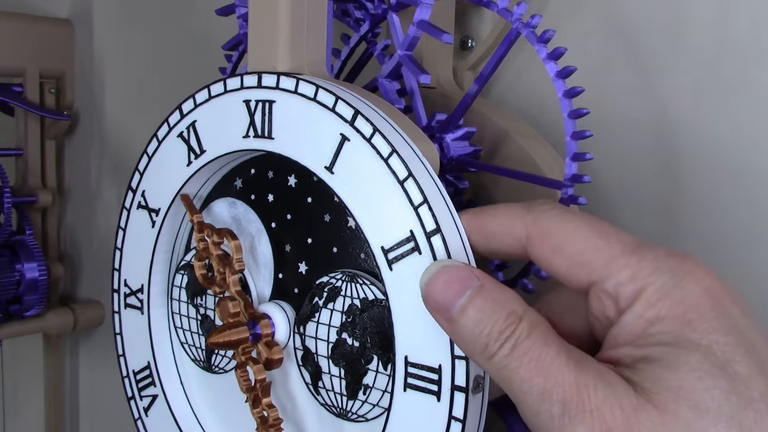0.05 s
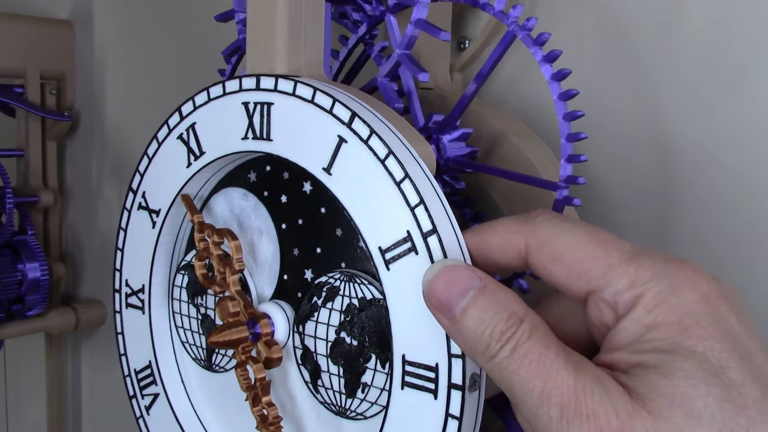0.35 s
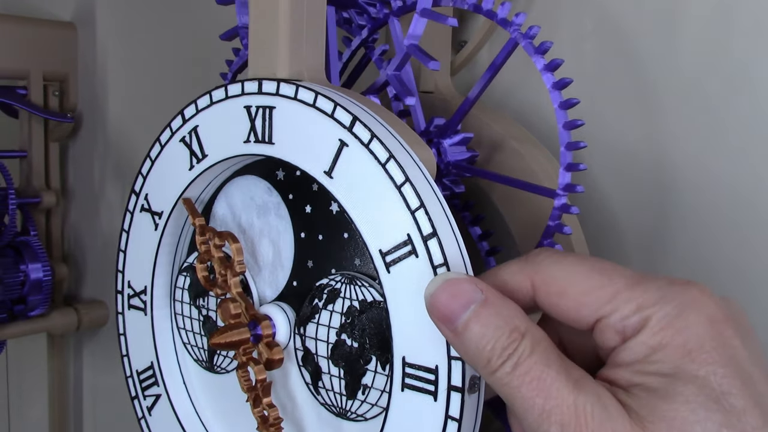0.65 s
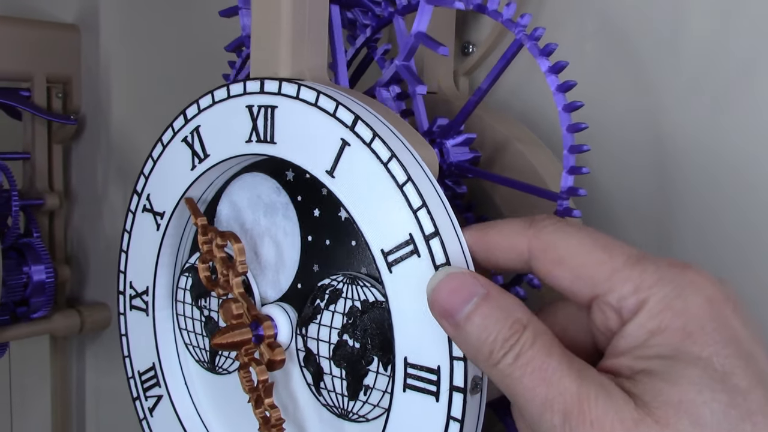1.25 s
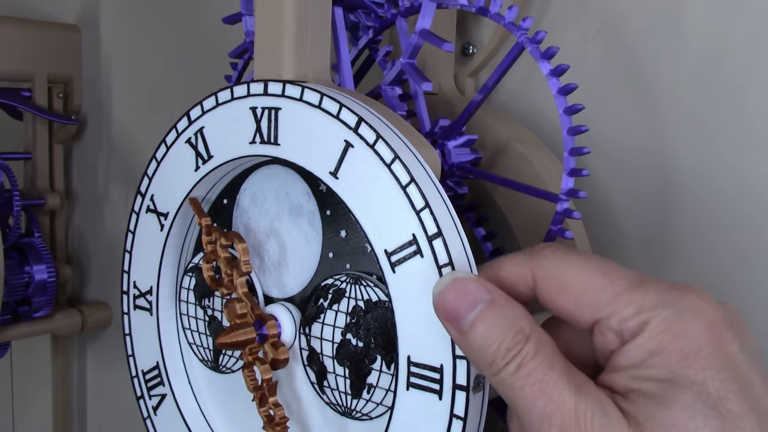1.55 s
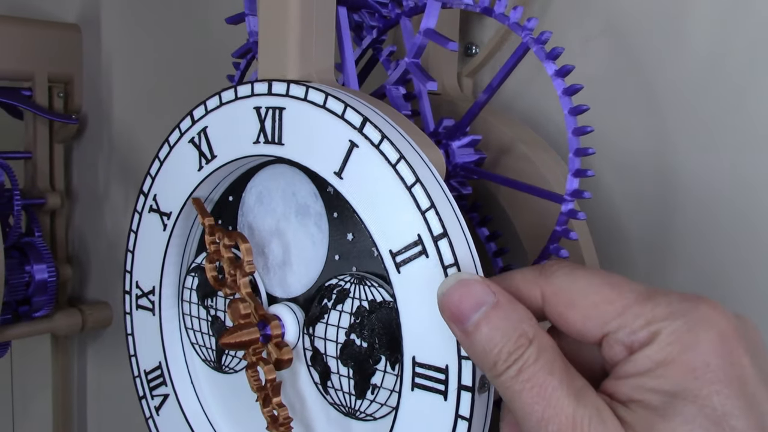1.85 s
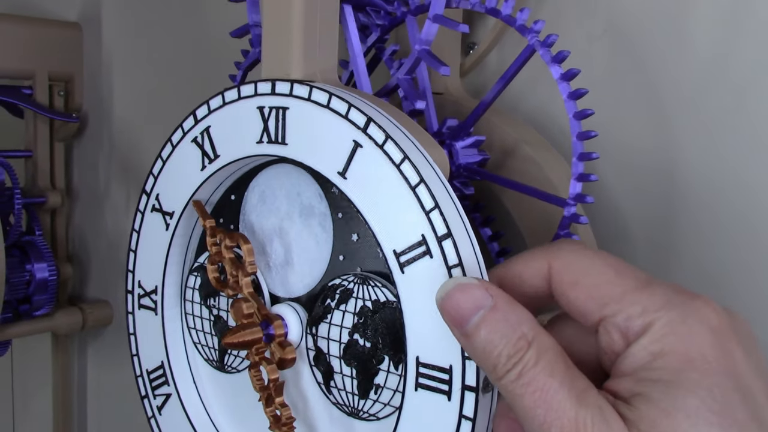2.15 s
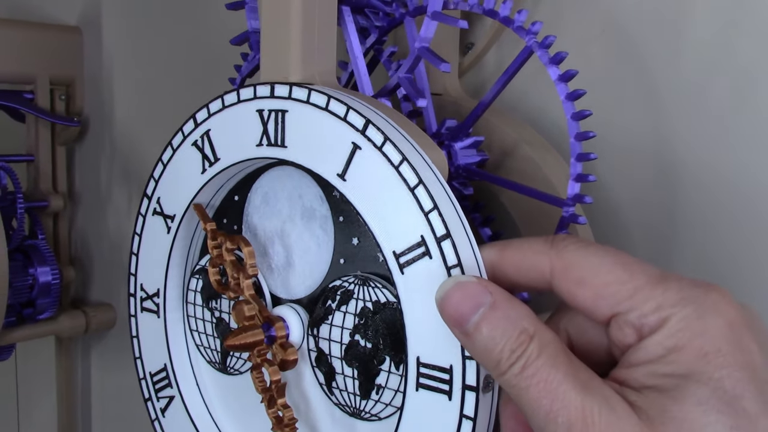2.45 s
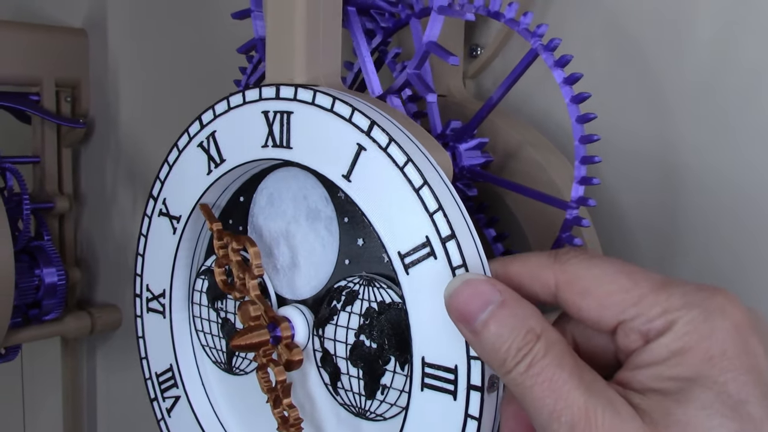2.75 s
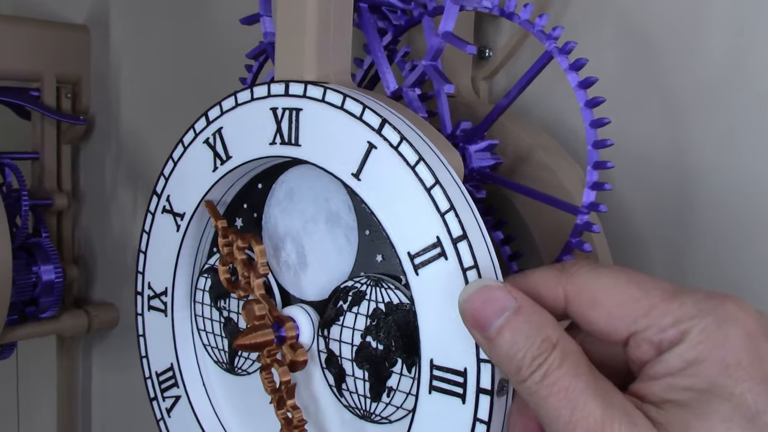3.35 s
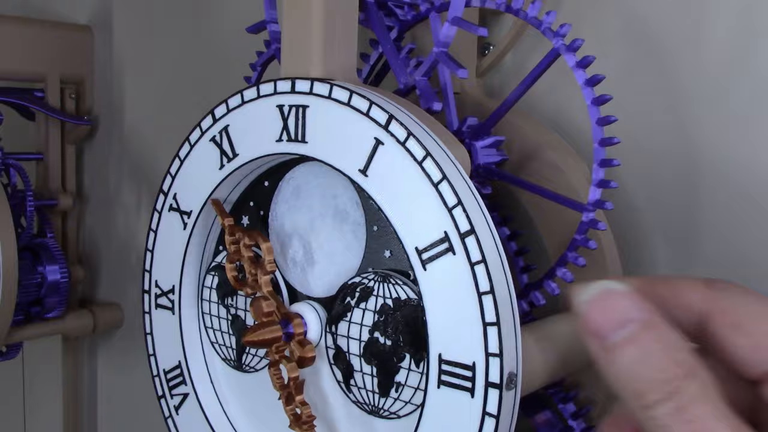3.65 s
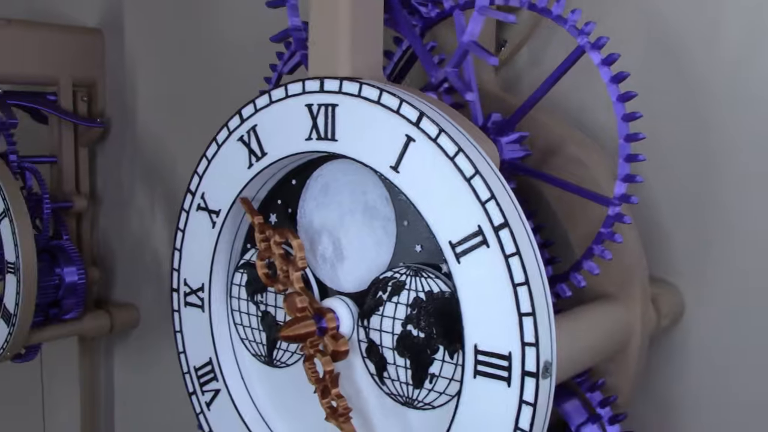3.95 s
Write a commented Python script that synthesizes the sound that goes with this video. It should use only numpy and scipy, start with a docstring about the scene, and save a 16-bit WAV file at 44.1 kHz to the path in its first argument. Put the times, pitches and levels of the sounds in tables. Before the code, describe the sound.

Plastic clock gears click and knock irregularly as a hand turns the dial. The loose teeth catch and drop in quick clusters, with faint rasps, for the first 1.5 seconds. After a short pause, clicks resume at about 1.8 seconds, with stronger knocks near 2.6 and 3.2. A few softer ones follow around 3.8 seconds. The small, quiet room has a faint hum and hiss.

```python
"""The loose gear teeth of a plastic clock slide, catch and drop as a hand turns its dial.
Each contact is a short scuff ending in a blow: the frame thuds, the wheels ring, the teeth clack and
snap, the thin rims crack. Here and there the tooth faces rasp as they slide. The walls of a small,
quiet room answer briefly, over a faint hum and hiss."""
import sys
import numpy as np
from scipy import signal
from scipy.fft import rfft, irfft, next_fast_len
from scipy.io import wavfile
from scipy.ndimage import map_coordinates

SR = 44100
rng = np.random.default_rng(int(sys.argv[2]) if len(sys.argv) > 2 else 0)


def dump_mix(stems):
    """Bounce the given channels to the path in sys.argv[1] as a 16-bit WAV at rate SR."""
    frames = np.atleast_2d(stems).T  # one column per channel
    limited = np.clip(frames, -1, 1)  # hard clip at full scale
    pcm = np.round(limited * 32767).astype(np.int16)
    wavfile.write(sys.argv[1], SR, pcm)


N = 176400
T = np.arange(int(.4 * SR)) / SR  # time axis of one ring-out, s


def amp(db):
    """Decibels to gain."""
    return 10 ** (np.asarray(db) / 20)


def unit(x):
    """Scale to an energy of 1."""
    return x / np.sqrt(np.sum(x ** 2) + 1e-20)


def noise(colour, size):
    """Noise of rms 1, shaped by a curve of (f/Hz, level/dB) points."""
    m = next_fast_len(size + 8192)
    hz, db = np.transpose(colour)
    gain = amp(np.interp(np.log(np.fft.rfftfreq(m, 1 / SR) + 1), np.log(hz), db))
    shaped = irfft(rfft(rng.standard_normal(m)) * gain, m)[:size]
    return unit(shaped) * np.sqrt(size)


def fade(t60):
    """Exponential decay, 60 dB down after t60 seconds."""
    return np.exp(-np.log(1000) * T / t60)


def add(track, x, start_s):
    """Mix x into the track from start_s on."""
    i = round(start_s * SR)
    x = x[max(-i, 0):][:N - max(i, 0)]
    track[max(i, 0):][:len(x)] += x


def room_tone():
    """Stereo bed: still air, a slightly unsteady hum and a faint hiss in opposite polarity per side."""
    # dark spectrum of the room's air: f/Hz, level/dB
    air = [(13, -28), (22, -2.5), (74, -3), (124, -5.5), (239, -12.5), (275, -14.5), (502, -14), (576, -18),
           (801, -20.5), (1420, -28), (1590, -28.5), (2330, -30.5), (2600, -32), (15500, -41)]
    hum_hz, hum_db, hiss_db, air_db = 71.14, -60, -79, -52
    t = np.arange(N) / SR
    drift = map_coordinates(rng.standard_normal(24), [4 * t])  # the phase wanders, 4 points a second
    hum = amp(hum_db) * np.sqrt(2) * np.sin(2 * np.pi * hum_hz * t + 0.13 * drift)
    hiss = amp(hiss_db) * rng.standard_normal(N)
    return amp(air_db) * noise(air, size=N) + hum + np.array([hiss, -hiss])


def contact(half_scuff_s):
    """Force of a tooth catching: a swelling scuff of micro-slips that ends in one sharp blow."""
    size = max(round(2 * half_scuff_s * SR), 2)
    swell = amp(np.linspace(-23, 0, size))
    slips = rng.standard_normal(len(T))[:size] * np.sqrt(rng.exponential(size=len(T)))[:size]
    force = np.sqrt(half_scuff_s / 0.0034) * unit(slips * swell)  # longer scuffs carry more energy
    force[-1] += 1  # the blow
    return force


def ring(modes):
    """Damped modes of a plastic part; each blow detunes them a touch and shares its energy out anew."""
    build_cycles = 1.06  # a mode takes this long to spread over its part
    out = np.zeros(len(T))
    for hz, db, t60 in modes:
        cycles = hz * (1 + rng.normal(0, 0.0075)) * T
        build = 1 - np.exp(-cycles / build_cycles)
        gain = amp(db + rng.normal(0, 1.54))
        tone = np.sin(2 * np.pi * (cycles + rng.random()))
        out += gain * unit(build * fade(t60) * tone)
    return unit(out)


def burst(lo_hz, hi_hz, t60):
    """Many close, quickly damped modes blur into a band of dying noise."""
    band = signal.butter(3, [lo_hz, hi_hz], 'band', fs=SR, output='sos')
    return unit(signal.sosfilt(band, rng.standard_normal(len(T)) * fade(t60)))


def strike(body, force, room_db, room_t60):
    """The force excites a body; the close walls answer with a short, diffuse tail."""
    wall_delay_s, wall_build_s = 0.0033, 0.003
    direct = unit(signal.fftconvolve(force, body))
    build = 1 - np.exp(-np.maximum(T - wall_delay_s, 0) / wall_build_s)
    echo_power = np.abs(signal.fftconvolve(force ** 2, (build * fade(room_t60)) ** 2))
    walls = rng.standard_normal(len(direct)) * np.sqrt(echo_power)
    tail = unit(signal.fftconvolve(body, walls)[:len(direct)])
    return direct + amp(room_db) * tail


def gears():
    """Loose teeth catch and drop; every contact sounds the frame, wheels, teeth and thin rims."""
    # tooth contacts: t/s of the blow, half the scuff's length/s, f/Hz of the struck wheel, level/dB,
    # then relative to that level: thud/dB, clack/dB, crack/dB, snap/dB
    contacts = [(0.003, 0.00083, 550, -39.5, -0.5, -5, -17, -26.5),
                (0.066, 0.003, 439, -43, 1, -12.5, -28, -36.0),
                (0.165, 0.0019, 397, -42, -3, -16, -35, -32.0),
                (0.18, 0.01, 520, -44.5, -11, -8.5, -34, -21),
                (0.194, 0.0021, 569, -34.5, 2.5, -9.5, -23.0, -33),
                (0.228, 0.0055, 564, -47.5, -9, -27, -34.0, -36.0),
                (0.345, 0.003, 420, -46, -11, -14.5, -37, -33),
                (0.383, 0.0035, 521, -40.5, 1.5, -10.5, -22, -21),
                (0.41, 0.0032, 398, -50.5, 0, -7.0, -24.0, -23),
                (0.439, 0.004, 443, -38.5, -4, -16, -27.5, -31),
                (0.472, 0.0043, 415, -50, -9, -8, -26, -22), (0.515, 0.003, 614, -40, 6, -10, -29.0, -30),
                (0.644, 0.002, 477, -52.0, -0.5, -12.5, -20.0, -19),
                (0.676, 0.001, 540.0, -41.5, 2, -7.5, -24.5, -34),
                (0.732, 0.0025, 470.0, -47.0, -3.5, -15, -36, -34),
                (0.775, 0.0044, 466, -45.5, -1.5, -28, -36, -37),
                (0.976, 0.008, 542, -53, -3, -16, -31, -29),
                (1.039, 0.0018, 580, -45, 0.0, -11.5, -41, -34.0),
                (1.069, 0.00056, 465, -37.5, -0.5, -1.5, -11.5, -18),
                (1.104, 0.002, 554, -38.5, -2, -23, -22, -46),
                (1.17, 0.0045, 570.0, -44, 1.5, -11, -31, -24),
                (1.205, 0.006, 474, -44.5, 2, -15.5, -30.0, -38),
                (1.295, 0.014, 550, -33.5, -2.5, -15.5, -27, -31),
                (1.355, 0.009, 576, -35, -5.5, -20, -40, -29),
                (1.42, 0.003, 506, -43.5, 1, -13.5, -34, -28),
                (1.823, 0.004, 530.0, -42, -4, -15.5, -30, -28),
                (1.842, 0.003, 529, -45.5, 0.5, -19, -28, -33),
                (1.951, 0.0039, 395, -45.0, -2, -13, -29.0, -32.0),
                (2.012, 0.003, 536, -50.5, 0, -28, -30.0, -29.0),
                (2.116, 0.00082, 613, -42.5, 0.0, -14.0, -39, -40),
                (2.162, 0.00098, 510, -34.5, -11.0, -10, -32.0, -40),
                (2.191, 0.0005, 573, -44.5, 2.5, 1, -12, -19.5),
                (2.222, 0.008, 457, -38.5, -3, -23, -41, -45),
                (2.423, 0.0023, 571, -40.5, -9, -14.5, -38, -40),
                (2.433, 0.00095, 606, -39.5, -7, -7, -18, -28),
                (2.492, 0.018, 514, -34.5, -1, -13.0, -30, -36.0),
                (2.639, 0.0058, 808, -32, 1, -7.0, -17, -28.5),
                (2.927, 0.0029, 555, -58, 13, -7.5, -20, -11),
                (3.025, 0.0072, 565, -37.5, -5.5, -14.0, -25.5, -24.5),
                (3.092, 0.0018, 394, -52.5, -3, -10, -31, -24.0),
                (3.165, 0.0075, 573, -31, -5.5, -9.5, -22.5, -24.5),
                (3.363, 0.012, 563, -57, 6.5, -20.0, -28, -25.0),
                (3.431, 0.0022, 580, -48, 0.5, -15.5, -34, -36),
                (3.8, 0.001, 440.0, -48.5, -6, -16.0, -25, -31.0),
                (3.818, 0.0027, 400.0, -56, 11.5, -8, -30, -26.0),
                (3.885, 0.014, 388, -54, 2.5, -10, -24, -25)]
    # modes of the four kinds of plastic part, low to high: f/Hz, level/dB, t60/s
    frame_modes = [(133, -6, 0.062), (173.7, -3, 0.08), (222.2, 2, 0.089), (265, -7.5, 0.026),
                   (312.2, -1, 0.075), (376, 1.5, 0.033)]
    train_modes = [(436.4, -3.5, 0.1), (497, -2, 0.048), (553, 0, 0.091), (607.3, -2, 0.087),
                   (706.5, -3.5, 0.043), (779, -5, 0.039)]
    tooth_modes = [(987, 1, 0.078), (1225, -0.5, 0.025), (1311, 1.5, 0.046), (1415, 0.5, 0.041),
                   (1849, 1.5, 0.044), (1962, -1.5, 0.044), (2236, -4, 0.054), (2310, -4.5, 0.043),
                   (2556, -8, .14)]
    rim_modes = [(3360, -3, 0.025), (3510, -4, 0.084), (4160, 0.5, 0.042), (4680, -8, 0.032),
                 (5170, -6.5, 0.034)]
    # bright spectrum of the snap: f/Hz, level/dB
    snap_colour = [(3000, -2), (5500, -4.5), (7000, 5), (9300, 0.5), (11000, -8), (15500, -8.5)]
    wheel_db, train_db = -3.5, -2.5  # the struck wheel's own note; the rest of the gear train
    out = np.zeros(N)
    for blow_s, half_scuff_s, wheel_hz, db, thud_db, clack_db, crack_db, snap_db in contacts:
        force = contact(half_scuff_s)
        slide_s = 2.5 * half_scuff_s  # a longer scuff also hisses on longer after the blow
        frame = ring(frame_modes) + amp(-2) * burst(167.6, 417, t60=0.016)
        wheel = ring([(wheel_hz, 0, 0.045)])
        train = ring(train_modes) + amp(-4) * burst(371, 1.61 * wheel_hz, t60=0.028)
        teeth = ring(tooth_modes) + burst(950, 2614, t60=0.042 + slide_s)
        rims = ring(rim_modes) + amp(4) * burst(2560, 5580, t60=0.026 + slide_s)
        snap = noise(snap_colour, size=len(T)) * fade(0.027 + slide_s)
        click = (amp(thud_db) * strike(frame, force, room_db=-1.5, room_t60=0.29)
                 + amp(wheel_db) * strike(wheel, force, room_db=-1, room_t60=0.21)
                 + amp(train_db) * strike(train, force, room_db=-1, room_t60=0.19)
                 + amp(clack_db) * strike(teeth, force, room_db=-2.5, room_t60=0.28)
                 + amp(crack_db) * strike(rims, force, room_db=-2.5, room_t60=0.3)
                 + amp(snap_db) * strike(snap, force, room_db=-5.5, room_t60=0.23))
        gain = amp(db) * np.sqrt(0.02 * SR)  # the energy of 20 ms at this level
        add(out, gain * click, blow_s - 2 * half_scuff_s)
    return out


def scrapes():
    """Tooth faces slide over each other with a thin rasp of tiny slips that eases off."""
    # plastic sliding on plastic: t/s, length/s, level/dB
    slides = [(0.166, 0.073, -61.5), (0.37, 0.17, -66.5), (1.167, .06, -68), (1.281, 0.2, -67),
              (3.155, 0.042, -61)]
    # thin, high spectrum of the rasp: f/Hz, level/dB
    rasp_colour = [(2500, -21), (5000, -2), (7000, -6.5), (9200, 2.5), (10500, -9), (15500, -10)]
    attack_s, slips_per_s, slip_db = 0.007, 250, 2.5
    envelope, t = np.zeros(N), np.arange(N) / SR
    for start_s, length_s, db in slides:
        attack = np.clip((t - start_s) / attack_s, 0, 1)
        release = np.sqrt(np.clip(1 - (t - start_s) / length_s, 0, 1))
        envelope += amp(db) * attack * release
    slips = map_coordinates(rng.standard_normal(2048), [t * slips_per_s], mode='wrap')
    return envelope * amp(slip_db * slips) * noise(rasp_colour, size=N)


def scene():
    """The clock dead centre over the room tone; its small parts radiate little bass."""
    low_cut = signal.butter(4, 145, 'high', fs=SR, output='sos')
    clock = signal.sosfilt(low_cut, gears() + scrapes())
    return clock + room_tone()


def record(dry):
    """A brick-wall high cut takes the very top off the mix."""
    top_hz = 15720
    m = next_fast_len(N + 8192)
    passband = np.fft.rfftfreq(m, 1 / SR) < top_hz
    return irfft(rfft(dry, m) * passband, m)[:, :N]


dry = scene()
out = record(dry)
dump_mix(out)
```